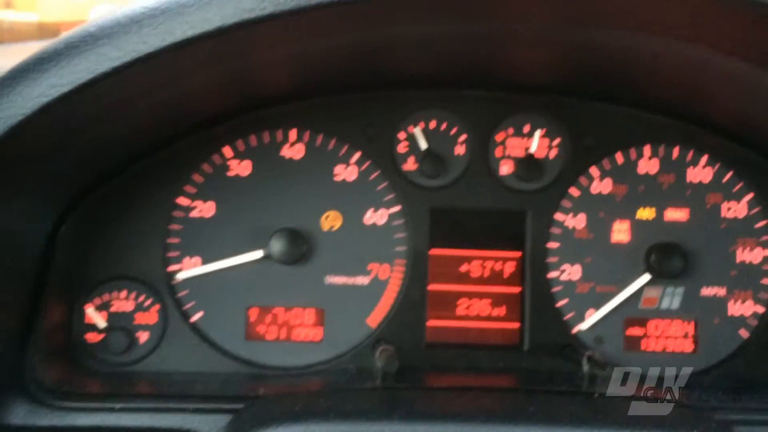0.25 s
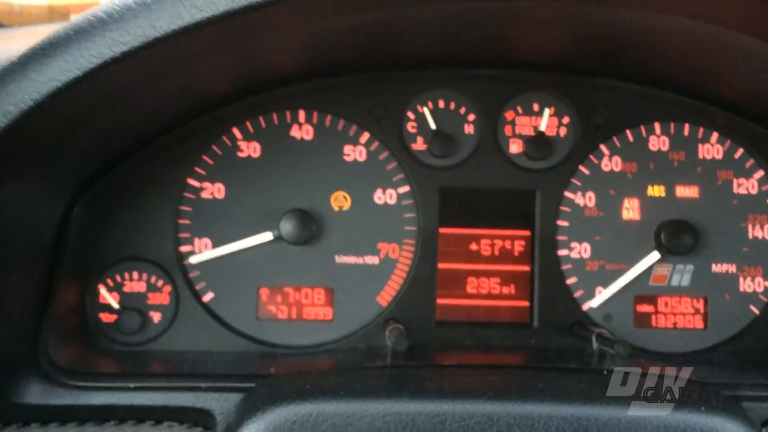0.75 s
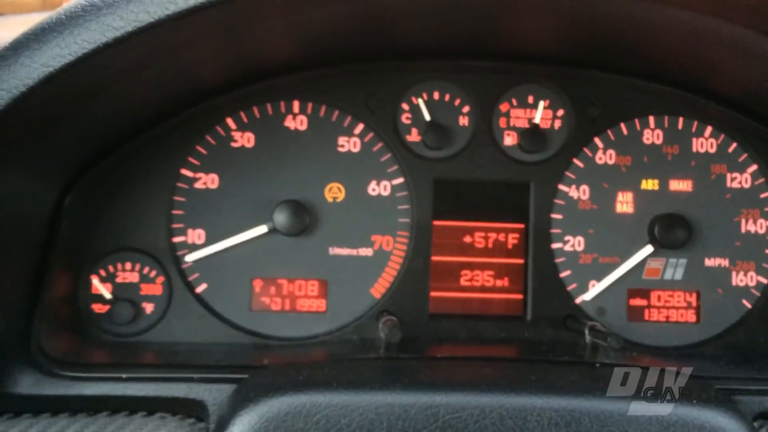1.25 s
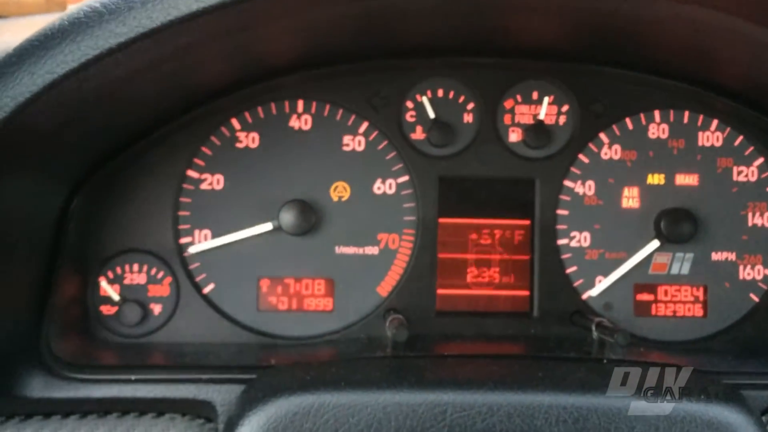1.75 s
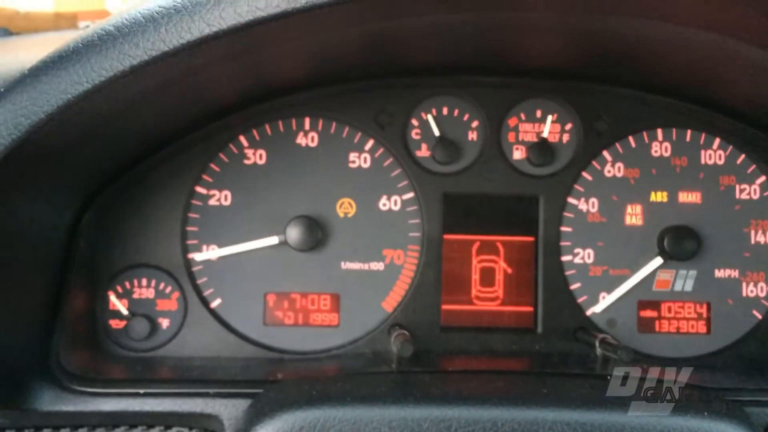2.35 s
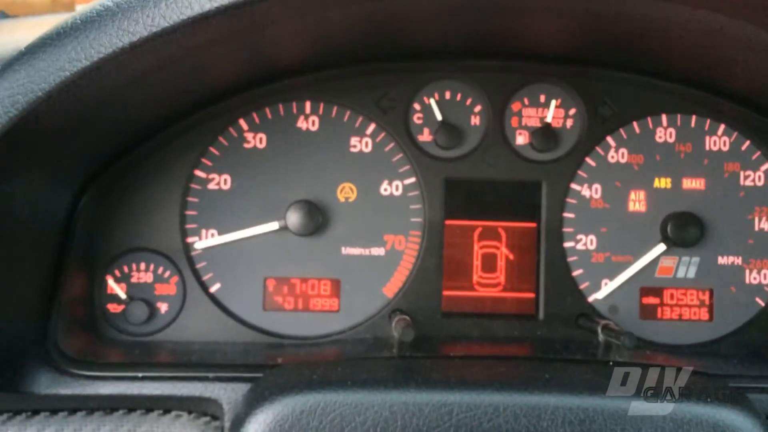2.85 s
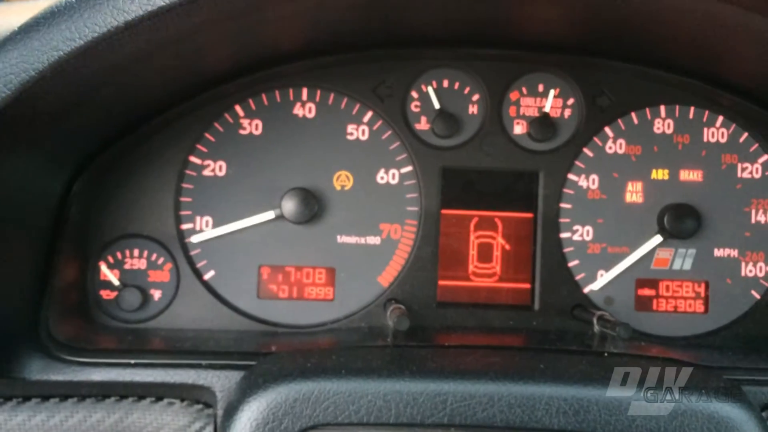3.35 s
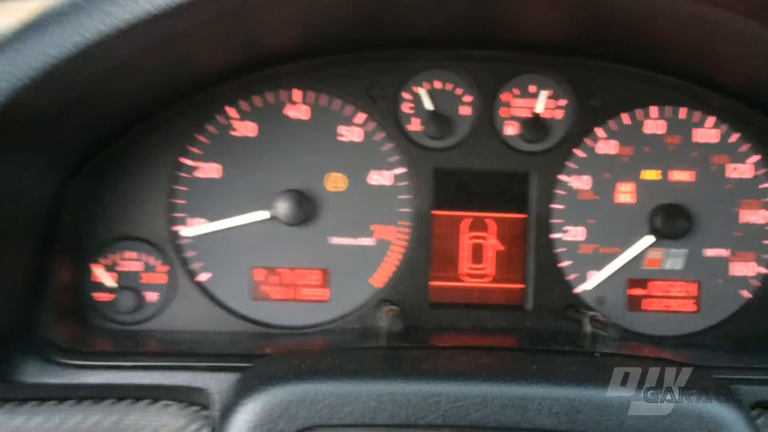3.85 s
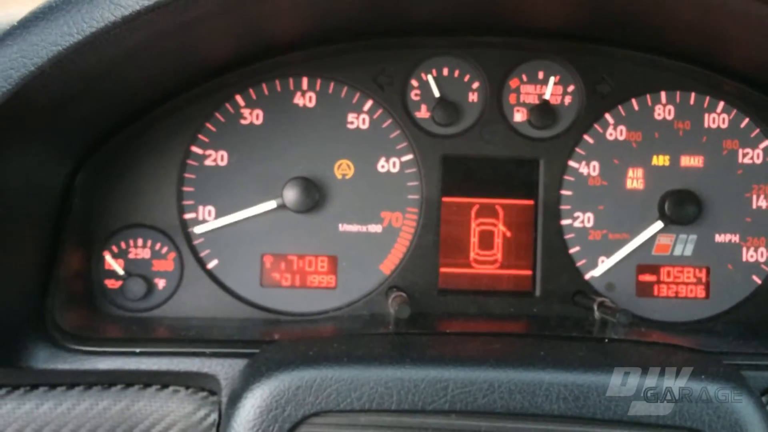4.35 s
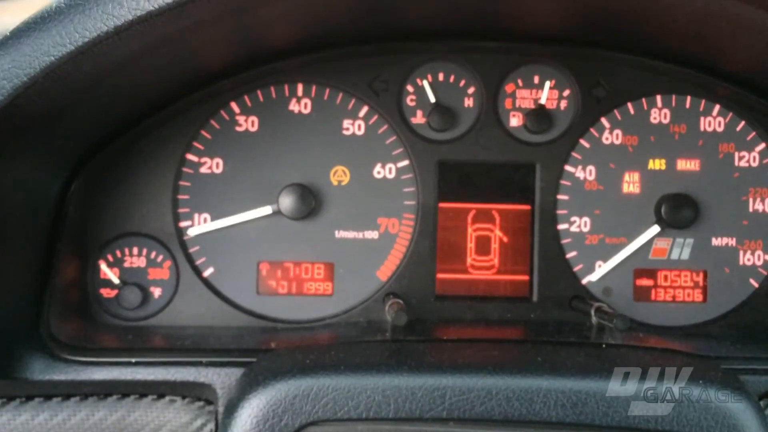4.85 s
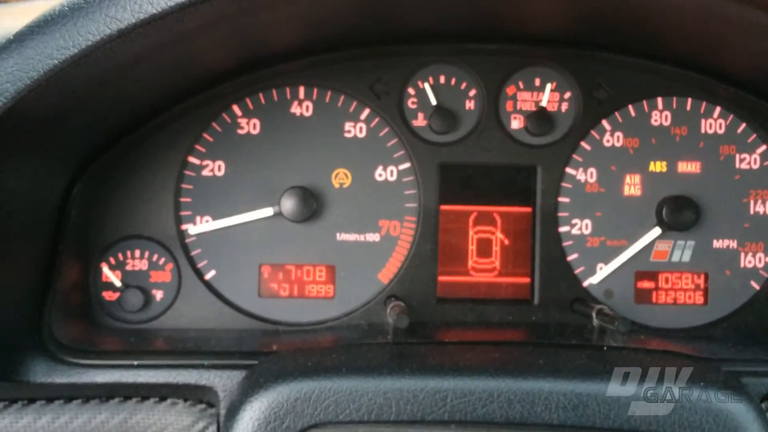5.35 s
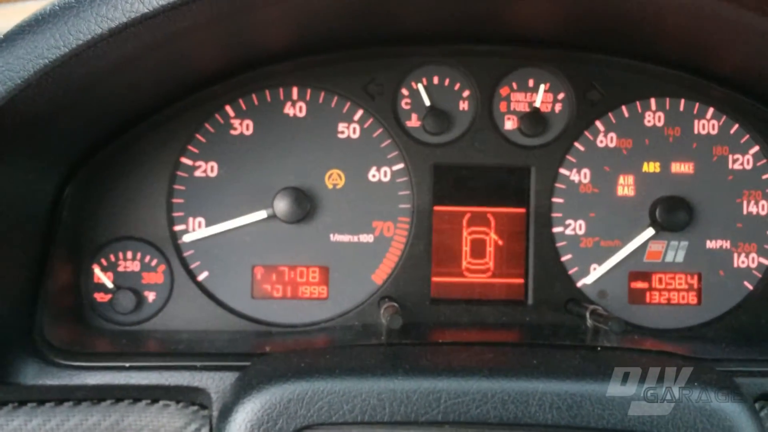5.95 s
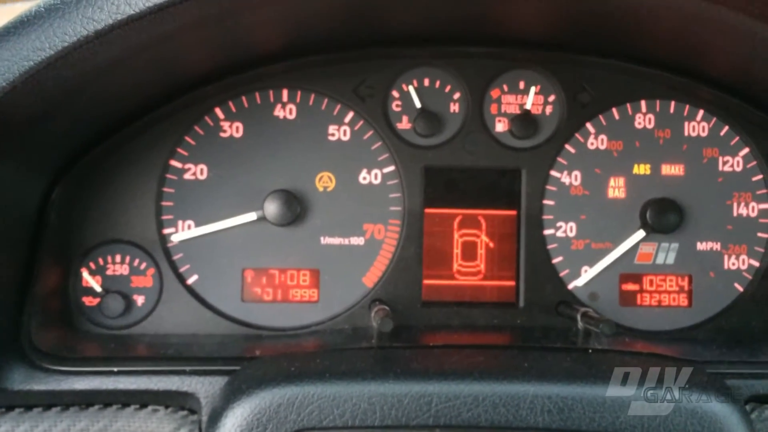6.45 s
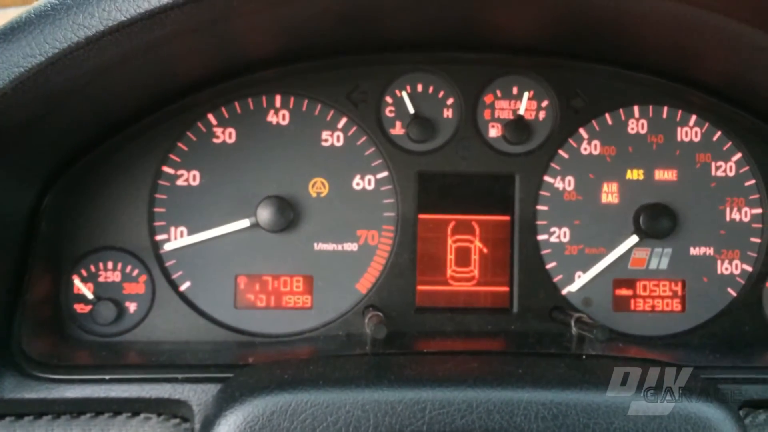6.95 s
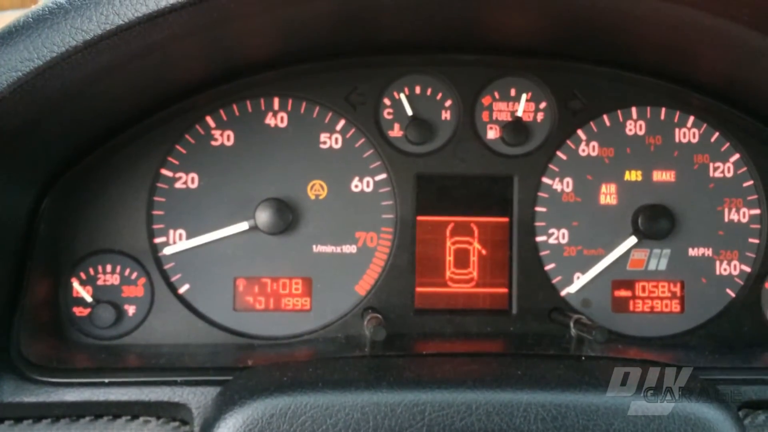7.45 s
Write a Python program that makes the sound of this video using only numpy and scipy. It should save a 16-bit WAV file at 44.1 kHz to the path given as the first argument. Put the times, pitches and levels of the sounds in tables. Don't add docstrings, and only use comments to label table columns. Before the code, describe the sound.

From the driver's seat, an idling engine stumbles and recovers repeatedly while a door latch clicks and rattles open, then a seat creaks.

```python
import sys
import numpy as np
from scipy import signal
from scipy.fft import rfft, irfft, next_fast_len
from scipy.io import wavfile
from scipy.ndimage import uniform_filter1d, map_coordinates

SR = 44100
rng = np.random.default_rng(int(sys.argv[2]) if len(sys.argv) > 2 else 0)


def wav_out(sig):
    wavfile.write(sys.argv[1], SR, np.round(np.clip(np.atleast_2d(sig).T, -1, 1) * 32767).astype(np.int16))


def level_to_linear(level):
    exponent = np.asarray(level, float) / 20
    return 10 ** exponent


N = 340011
TIME = np.arange(N) / SR
MEAN_HZ = 44


def unit(x):
    return x / np.sqrt(np.mean(x ** 2) + 1e-20)


def steady(x):
    return x / np.sqrt(np.abs(uniform_filter1d(x ** 2, size=SR // 4)) + 1e-20)


def curves(rows):
    s, *columns = np.transpose(rows)
    return [np.interp(TIME, s, column) for column in columns]


def ramp(s, length_s):
    return np.clip((TIME - s) / max(length_s, 0.001), 0, 1)


def wobble(rate):
    return map_coordinates(rng.standard_normal(int(N * rate / SR) + 4), [TIME * rate])


def filtered(x, response):
    m = next_fast_len(N + SR // 2)
    return irfft(rfft(x, m) * response(np.fft.rfftfreq(m, 1 / SR)), m)[:N]


def resonant(x, modes):
    def response(f):
        total = 0
        for k, (centre, width, db) in enumerate(modes):
            damping = 1j * f * width
            total = total + (-1) ** k * level_to_linear(db) * damping / (centre * centre - f * f + damping)
        return total
    return filtered(x, response)


def noise(spectrum):
    hz, db = np.transpose(spectrum)
    colour = lambda f: level_to_linear(np.interp(np.log(f + 1), np.log(hz), db))
    return unit(filtered(rng.standard_normal(N), colour))


def knocks(rows):
    out = np.zeros(N + SR)
    t = np.arange(SR // 5) / SR
    for s, db, hz, t60 in rows:
        fall = level_to_linear(db + 4 - 60 * t / t60) * (1 - np.exp(-t / 0.0028))
        out[round(s * SR):][:len(t)] += fall * np.sin(2 * np.pi * hz * t)
    return out[:N]


def whistle(points):
    hz, db = curves(points)
    edge = np.clip(np.minimum(TIME - points[0][0], points[-1][0] - TIME) / 0.012, 0, 1)
    level = edge * level_to_linear(db + 8 + 0.9 * wobble(60))
    return level * np.sin(2 * np.pi * np.cumsum(hz * (1 + 0.0025 * wobble(90))) / SR)


# t/s, firing rate f/Hz, firing level/dB
IDLE_SPEED = [(0, 44.3, -15.5), (0.1, 42.92, -18), (0.32, 40.3, -22), (0.88, 40.27, -22.5), (1.04, 40, -19),
              (1.85, 48.96, -18.5), (2.1, 48.85, -16), (2.77, 46.09, -17), (3.5, 47.98, -18.5),
              (4.1, 43.23, -15), (4.9, 48.65, -19), (5.35, 44.89, -17.5), (5.95, 46.72, -17),
              (6.45, 43.24, -18), (7.6, 39.76, -17.5), (7.71, 39.2, -21.5)]
# cut t/s, slowest t/s, relit t/s, sag f/Hz, loss level/dB
FUEL_CUTS = [
    (1.02, 1.37, 1.45, 7.5, -14),
    (2.78, 3.03, 3.14, 11.6, -16),
    (4.095, 4.37, 4.5, 8.6, -16),
    (5.34, 5.57, 5.685, 10, -11),
]


def crank():
    kick_db, kick_s = 3, 0.048
    surge_db, surge_s = 4.5, 0.098
    cut_s, relight_s, recover_s = 0.018, 0.087, 0.2
    rate, boom_db = curves(IDLE_SPEED)
    cut = np.zeros(N)
    for s, slowest, relit, sag_hz, loss_db in FUEL_CUTS:
        recovery = np.exp(-(np.maximum(TIME - slowest, 0) / recover_s) ** 2)
        rate = rate - sag_hz * ramp(s, slowest - s) * recovery
        back = ramp(relit - relight_s, relight_s)
        off = ramp(s - cut_s / 2, cut_s) - back
        cut = cut + off
        kick = ramp(s - kick_s, kick_s) - ramp(s, cut_s)
        surge = back * np.exp(-(np.maximum(TIME - relit, 0) / surge_s) ** 2)
        boom_db = boom_db + kick_db * kick + loss_db * off + surge_db * surge
    return rate, boom_db, cut


# strength level/dB, lateness in firings
CYLINDERS = [(3, 0.0038), (1, 0.021), (3, -0.0097), (2, 0.013), (3, -0.012), (1.5, 0.033)]
# f/Hz, width f/Hz, level/dB
BOOM_SHUT = [(41.5, 43, -4), (77.7, 18, -0.5), (127.4, 19, -3)]
# f/Hz, width f/Hz, level/dB
BOOM_OPEN = [(42.8, 14.55, 0), (83, 17, 2), (128.8, 16.7, -6)]
# f/Hz, width f/Hz, level/dB
EXHAUST = [(170, 35.8, -1.5), (185.9, 27.9, 1.5)]


def firings(rate, boom_db, cut):
    turns = np.cumsum(rate) / SR
    count = np.arange(int(turns[-1]))
    size_db, late = np.transpose(CYLINDERS)[:, count % 6]
    chance = rng.standard_normal((len(count), 2))
    weak = np.interp(count, turns, cut)
    due = count + late + (0.015 + 0.14 * weak) * chance[:, 0]
    at = np.interp(due, turns, np.arange(N)).astype(int)
    pulses = np.bincount(at, level_to_linear(size_db + (0.84 + 3.0 * weak) * chance[:, 1]), N)

    opened = ramp(1.97, 0.32)
    boom = (1 - opened) * steady(resonant(pulses, BOOM_SHUT)) + opened * steady(resonant(pulses, BOOM_OPEN))
    boom = filtered(boom, lambda f: 1 / (1 + (f / 165) ** 8) * f ** 4 / (f ** 4 + 30 ** 4))

    ring = steady(resonant(resonant(pulses, EXHAUST), [(173.4, 42.7, 0)]))
    shut_db = -11
    open_db = -7 + 1.64 * (rate - MEAN_HZ) * (1 - cut) + 3 * cut
    ring_db = shut_db + ramp(1.945, 0.61) * (open_db - shut_db)
    return level_to_linear(boom_db) * (boom + level_to_linear(ring_db) * ring)


def through_door(rate, shut_db, open_db, db_per_hz):
    return shut_db + open_db * ramp(1.06, 0.54) + db_per_hz * (rate - MEAN_HZ)


# f/Hz, level/dB
DRONE = [(130, -33), (225, -1), (247, -12), (280, -5.5), (427, -13), (471, -11.5), (600, -25), (780, -44.5),
         (1320, -120)]
# multiple of the firing rate, level/dB over the drone
HIGHER_ORDERS = [(5, -20), (6, -5.5), (7, -6.5), (8, -10.5), (10, -12), (11, -15), (20, -20)]


def drone(rate, cut):
    turns = np.cumsum(rate) / SR
    upper = 0
    for multiple, db in HIGHER_ORDERS:
        tone = np.cos(2 * np.pi * (round(multiple) * turns + rng.random()))
        upper = upper + level_to_linear(db + 2.1 * wobble(6)) * tone
    level_db = through_door(rate, -45.5, 4.53, 0.18)
    return level_to_linear(level_db + 0.5 * wobble(7.4)) * (noise(DRONE) + (1 - cut) * upper)


# f/Hz, level/dB
CLATTER = [(330, -41), (560, -0.5), (600, -1), (967, -2), (1130, -5.5), (1400, -3.5), (1570, -9.5),
           (1860, -8.5), (6000, -31.5), (7800, -40.5), (13200, -120)]
# f/Hz, width f/Hz, level/dB
DASH = [(952, 19, 9.5), (1330, 48, 17), (1410, 11, -5), (1910, 78, -22)]


def clatter(rate, rub):
    beat = 1 + 0.066 * np.cos(2 * np.pi * np.cumsum(rate) / SR)
    tin = noise(CLATTER)
    tin = tin + 0.5 * unit(resonant(tin, DASH))
    level_db = through_door(rate, -55, 8.8, 0.09)
    return (level_to_linear(level_db + 0.51 * wobble(8)) + rub) * unit(beat * tin)


# f/Hz, level/dB
HISS = [(2650, -8), (4500, -6.5), (14000, -15), (14700, -16), (15600, -29)]


def hiss(rate, rub):
    level_db = through_door(rate, -62.5, 4.6, 0.21) - 2 * ramp(6.05, 0.44)
    return (level_to_linear(level_db + 0.65 * wobble(3.45)) + rub) * noise(HISS)


# f/Hz, level/dB
BODY_SHAKE = [(18, -37), (36, -5.5), (60, 4), (90, 7), (130, 8.5), (170, -4), (215, -9), (260, -56.5)]


def shake():
    return level_to_linear(-31 + 4.0 * wobble(11)) * noise(BODY_SHAKE)


# t/s, f/Hz, level/dB
PUMP = [(0, 1723, -73), (3, 1677, -67), (3.4, 1708, -80)]


def pump():
    return whistle(PUMP)


# t/s, peak level/dB, bright level/dB, thud level/dB, die-away t/s
FINGERS = [(0.026, -32, 5, -4, 0.094), (0.236, -34, -16, -1.5, .066), (0.269, -33.5, -1, -19, 0.028),
           (0.328, -37, -1.5, -12, 0.16), (0.704, -39, -6, 0, 0.17), (0.838, -42, 4, 1, 0.11)]
PAWL = [(0.956, -2, -11.5, -20.5, 0.078), (1.098, -21, -25, -9, 0.069), (1.166, -12, -24, -9.5, .06),
        (1.213, -10.5, -20.5, -5.5, 0.077), (1.245, -24.5, -2.5, 3.5, 0.079), (1.305, -34.5, -1, -15, .1),
        (1.312, -25, -4.5, -11, 0.076), (1.379, -49, 2, -26, 0.046), (1.393, -18, -15, -4, 0.24),
        (1.416, -7, -15.5, -24, 0.074), (1.472, -16.5, -4, -15, 0.098), (1.497, -30.5, -3, -13, 0.11),
        (1.535, -35.5, 11, -30, 0.1), (1.557, -9.5, -5, -17, 0.098), (1.58, -31.5, 2, -17, 0.049),
        (1.642, -20, -2.5, -20, 0.16), (1.653, 5.5, -8.5, -16, 0.077), (1.723, -27.5, -30, -3, 0.13),
        (1.742, -21.5, -26, -8, .061), (1.78, -21, -18, -15.5, 0.084), (1.788, -18, -16.5, -20, 0.097),
        (1.877, -27.5, -2, -20, .07)]
STRAP = [(1.987, -16.5, -7, -9, 0.13), (2.058, -13, 3.5, -24, 0.085), (2.108, -11.5, -11.5, -38, 0.071),
         (2.346, -30, -6.5, -14, 0.092), (2.393, -25, -11.5, -14, 0.096), (2.427, -32.5, -2, -17, 0.073),
         (2.47, -21, -3.5, -7, 0.074), (2.611, -28.5, -5.5, -6.5, 0.1), (3.264, -28.5, -4, -14, 0.02)]
SEAT = [(5.88, -26, -28, 4, 0.087), (5.929, -20.5, -25, -2, 0.073), (5.974, -46, 6.5, -10, .03),
        (5.752, -39, -3, -20, .04)]
# f/Hz, level/dB
PANEL = [(400, -52), (680, -1.5), (1040, 1.5), (1810, -6.5), (2070, -8.5), (2670, -8.5), (3030, -16.5),
         (3720, -17.5), (4500, -19), (5850, -43), (9900, -120)]
# f/Hz, width f/Hz, level/dB
PANEL_MODES = [(730, 79, -4.5), (957, 52, 0), (1183, 28, -9.5), (1371, 46, 2), (1575, 190, -5.5),
               (2005, 21, 1), (2070, 77, -3), (2257, 140, -0.5), (2535, 21, -4.5), (2550, 28, -6)]
# f/Hz, level/dB
SNAP = [(1470, -24.5), (2500, -5.5), (3030, -8), (3700, -5.5), (4950, -10.5), (6990, -9.5), (13700, -21),
        (15600, -35)]
# f/Hz, level/dB
STEEL = [(900, -41.5), (1400, -1), (1600, 3.5), (1800, -1), (2000, 2), (2400, -10.5), (3200, -39)]
# f/Hz, level/dB, die-away t/s
LATCH = [(3460, 3, 0.04), (6930, 1, 0.055), (7348, -15, 0.04), (8800, -27, 0.05)]


def contacts():
    dull = noise(PANEL)
    dull = unit(0.87 * dull + unit(resonant(dull, PANEL_MODES)))
    bright = noise(SNAP)
    low = noise([(200, -47), (260, 6), (330, -3.5), (420, 3), (520, -9.0), (600, -15.5), (700, -58)])
    steel = noise(STEEL)
    ragged_db = 2.2 * wobble(260)
    out = np.zeros(N + SR)
    t = np.arange(SR // 5) / SR
    for s, db, bright_db, thud_db, t60 in FINGERS + PAWL + STRAP + SEAT:
        now = slice(round(s * SR), round(s * SR) + len(t))
        ring = 0
        for hz, level, decay in LATCH:
            ring = ring + level_to_linear(level + rng.normal(0, 1.4) - 60 * t / decay) * np.sin(2 * np.pi * hz * t)
        tail = level_to_linear(-60 * t / max(t60, 0.01))
        fall = tail * (1 + 0.9 * level_to_linear(-60 * t / 0.014))
        crack = 2.2 * level_to_linear(-60 * t / 0.005) + tail ** 1.2
        body = dull[now] + level_to_linear(thud_db + 6) * low[now] + level_to_linear(-2.5 + 0.48 * db) * steel[now]
        rattle = fall * body + level_to_linear(bright_db) * crack * bright[now]
        rattle = level_to_linear(ragged_db[now] * np.minimum(t / 0.0043, 1)) * rattle
        rise = 1 - np.exp(-t / 0.0004)
        out[now] += level_to_linear(db - 10) * rise * (rattle + level_to_linear(-23.5 + 1.0 * db) * ring)
    return out[:N]


# t/s, peak level/dB, f/Hz, die-away t/s
DOOR_THUDS = [(0.972, -22, 98.5, 0.13), (1.432, -16, 95, 0.047), (1.471, -2, 109.4, .05),
              (1.225, -3, 170, 0.043), (1.313, -15.5, 170, 0.2), (1.421, -1, 166, 0.063),
              (1.47, 0.5, 181, 0.074), (1.788, -5, 168, 0.095), (2.475, -18.5, 184, 0.14)]


def door_skin():
    return knocks(DOOR_THUDS)


# t/s, peak level/dB, f/Hz, die-away t/s
LONE_FIRINGS = [(1.155, -14, 90, .06), (1.22, -13, 55, .07), (1.32, -14, 106, 0.12),
                (1.335, -13.5, 62.2, 0.16), (2.889, -14, 75, 0.058), (2.952, -10, 94.36, 0.047),
                (3.01, -12.5, 73, 0.068), (3.073, -10, 75, .08), (4.216, -8.5, 69, 0.057),
                (4.276, -15, 69, .07), (4.308, -13.5, 75.4, 0.092), (4.378, -9.5, 70.5, 0.066),
                (4.436, -10.5, 73.84, 0.065), (5.443, -15.5, 70, .06), (5.508, -11.5, 73, 0.055),
                (5.571, -10, 72, 0.073), (5.625, -13, 70, 0.056)]


def lone_firings():
    return -knocks(LONE_FIRINGS)


# t/s, length t/s, clatter level/dB, hiss level/dB
SEAL_RUBS = [
    (1.36, .24, -58.5, -51.5),
    (1.722, 0.24, -81, -55),
]


def seal_rub():
    edge_s = 0.03
    rub = 0
    for s, span, *db in SEAL_RUBS:
        rub = rub + np.outer(level_to_linear(db), ramp(s, edge_s) - ramp(s + span, edge_s))
    return rub * level_to_linear(2.5 * wobble(23.93) + 2.5 * wobble(220))


# t/s, length t/s, first f/Hz, last f/Hz, level/dB
BIRD_NOTES = [(3.49, .12, 4350, 4650, -64), (4.24, .098, 4300, 4590, -52), (4.232, .04, 3850, 3800, -66),
              (5.575, .055, 3430, 3385, -58), (5.74, .03, 3300, 3300, -62), (6.168, .095, 4340, 4540, -51),
              (6.195, .08, 3210, 3225, -65), (7.26, .05, 3320, 3340, -59), (4.26, .03, 2520, 2520, -57),
              (4.27, .065, 3250, 3250, -65), (5.46, .03, 4630, 4630, -60), (5.431, .034, 612, 612, -48),
              (5.527, .057, 597, 597, -45), (6.32, .15, 3500, 3500, -69), (6.501, .042, 2590, 2590, -63)]
# t/s, f/Hz, level/dB
BIRD_CALL = [(4.33, 6400, -72), (4.36, 6350, -60), (4.4, 6630, -56), (4.415, 5800, -71), (4.445, 4930, -63),
             (4.48, 4650, -71), (4.52, 4540, -70), (4.61, 4320, -68), (4.65, 4150, -69)]


def birds():
    out = whistle(BIRD_CALL)
    for s, span, hz, last_hz, db in BIRD_NOTES:
        peak = (s + 0.43 * span, hz + 0.9 * (last_hz - hz), db)
        out += whistle([(s, hz, db - 12.5), peak, (s + span, last_hz, db - 7.5)])
    return out


# t/s, peak level/dB, f/Hz, die-away t/s
SEAT_FRAME = [(5.904, -31, 370, 0.079), (5.905, -30, 605, 0.077), (5.931, -23, 500, 0.11),
              (5.931, -30.5, 600, 0.13)]


def seat_frame():
    return knocks(SEAT_FRAME)


def scene():
    rate, boom_db, cut = crank()
    clatter_rub, hiss_rub = seal_rub()
    engine = firings(rate, boom_db, cut) + drone(rate, cut) + shake() + lone_firings()
    engine = engine + clatter(rate, clatter_rub) + hiss(rate, hiss_rub)
    door_and_seat = contacts() + door_skin() + seat_frame()
    return (engine + door_and_seat + pump() + birds())[None]


def top_cut(x):
    return signal.sosfilt(signal.butter(12, 15800, fs=SR, output="sos"), x)


def record(dry):
    band_limit = lambda f: 1 / (1 + (f / 15400) ** 60)
    mix = np.clip(filtered(dry[0], band_limit)[None], -1, 1)
    return top_cut(mix)


dry = scene()
out = record(dry)
wav_out(out)
```